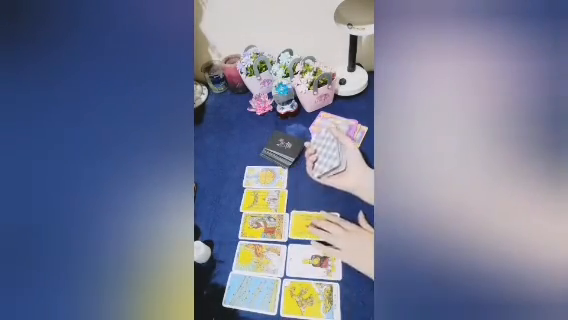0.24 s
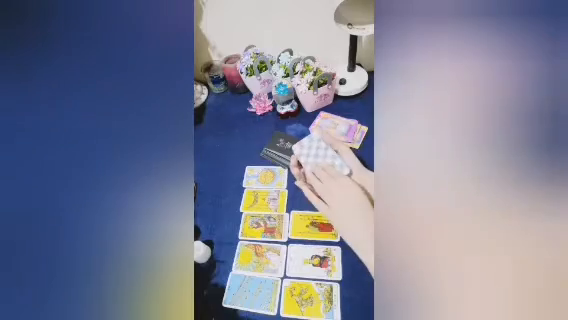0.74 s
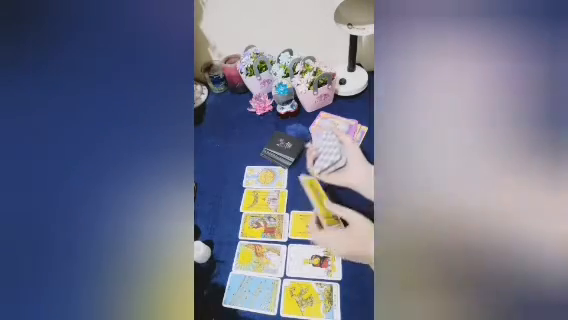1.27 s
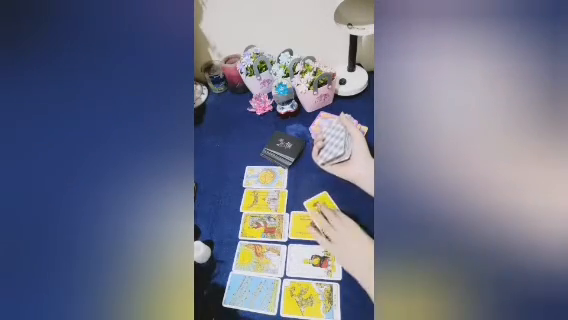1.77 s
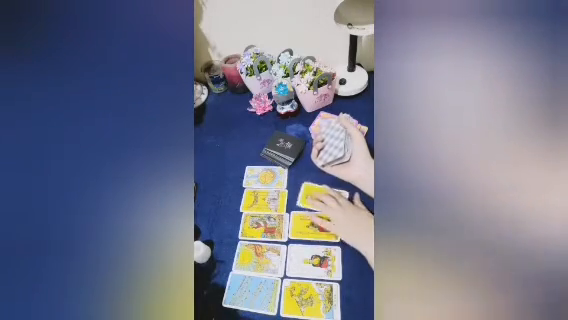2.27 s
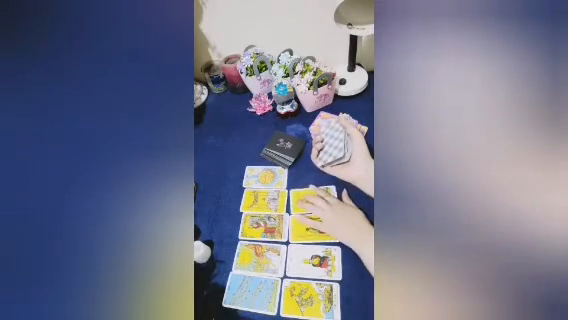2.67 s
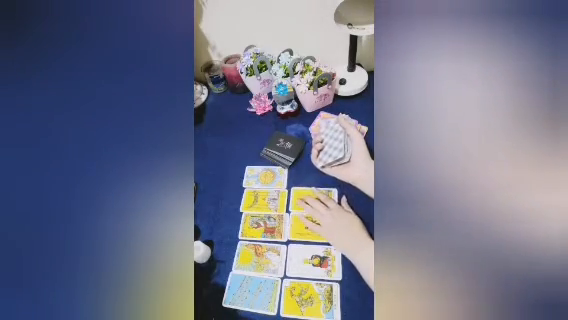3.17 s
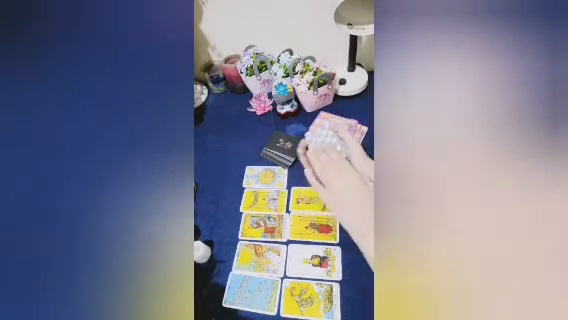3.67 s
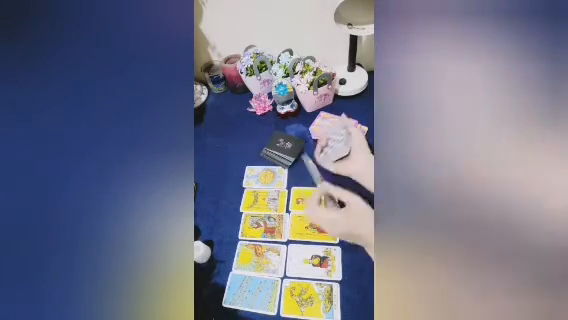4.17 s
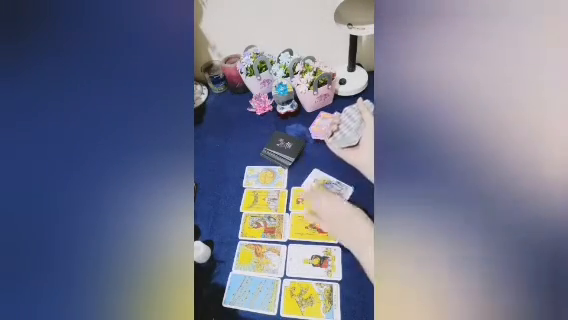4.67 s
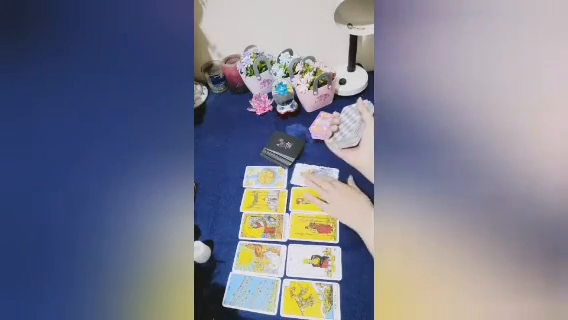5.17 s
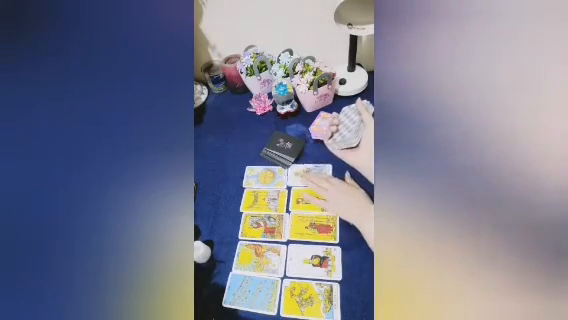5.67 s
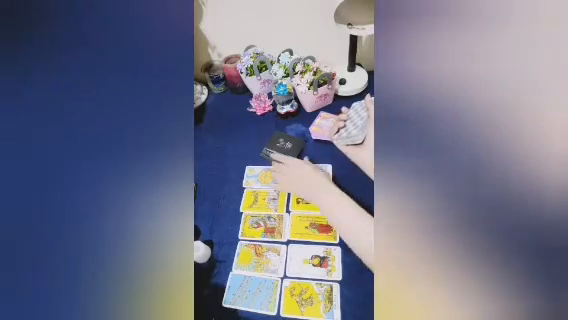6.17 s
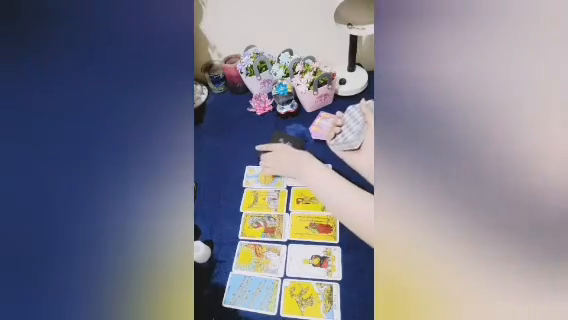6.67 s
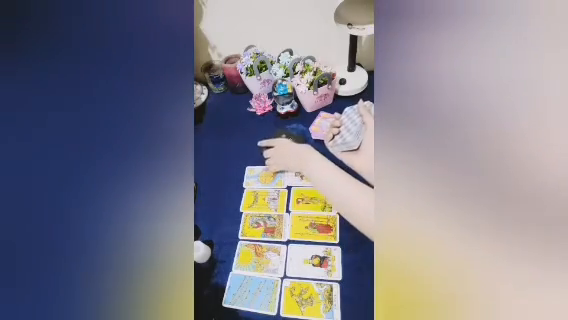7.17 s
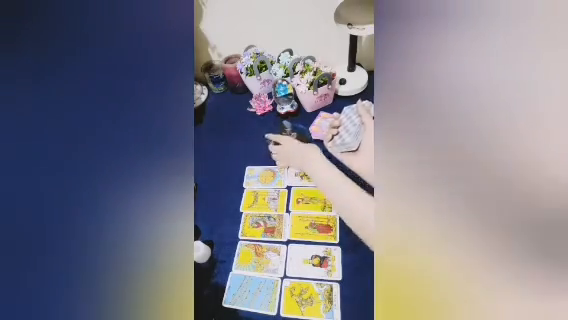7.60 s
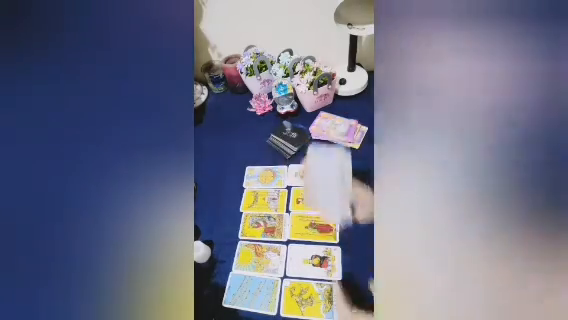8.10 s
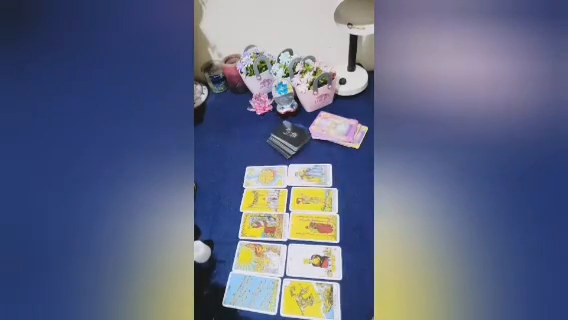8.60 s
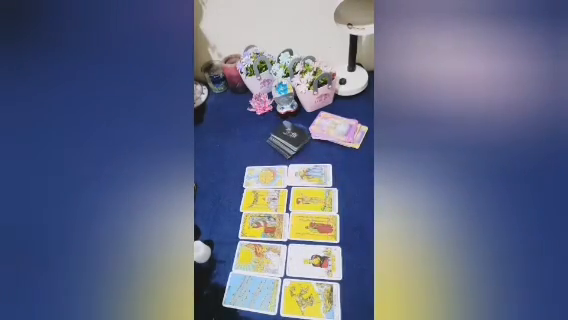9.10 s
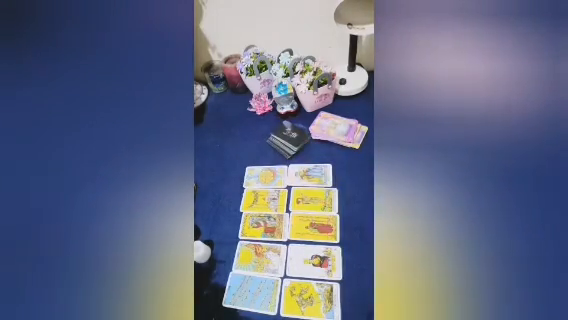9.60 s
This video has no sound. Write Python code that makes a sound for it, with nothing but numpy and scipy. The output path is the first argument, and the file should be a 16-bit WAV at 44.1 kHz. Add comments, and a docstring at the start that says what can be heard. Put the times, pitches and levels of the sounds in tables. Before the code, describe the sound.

Close on a cloth-covered table, three cards in turn scrape off the deck, snap crisply and scuff into place. Mains hum, a fluttering fan, soft hiss and very faint fast clock ticks continue underneath. A dull tap and a brief slide follow, then a very loud, short wooden bang with rattling bounces, ducking the room sound, and a faint last tap.

```python
"""Tarot cards are drawn from a hand-held deck, snapped down and slid into place on a cloth-covered table.
Under them a small room hums, hisses, whines and ticks; near the end a hard knock on wood ducks a limiter.
Snaps and knocks are damped modes with noise cracks; slides are grainy noise shaped by the hand's speed.
An appliance's hum and motor and the whine of electronics are wavering sines.
The fan's air, the low rumble and the small clock's ticks are filtered noise."""
import sys
import numpy as np
from scipy import signal
from scipy.fft import rfft, irfft, next_fast_len
from scipy.io import wavfile
from scipy.ndimage import uniform_filter1d, minimum_filter1d, map_coordinates

SR = 44100
rng = np.random.default_rng(int(sys.argv[2]) if len(sys.argv) > 2 else 0)


def store_wav(level_fs):
    """Save 16-bit WAV to argv[1]."""
    pcm = np.round(np.clip(np.atleast_2d(level_fs), -1, 1) * 32767)
    wavfile.write(sys.argv[1], SR, pcm.T.astype(np.int16))


N = 434385  # length in samples


def amp(db):
    """Decibels to gain."""
    return 10 ** (np.asarray(db) / 20)


def unit(x):
    """Scale to rms 1."""
    return x / np.sqrt(np.mean(x ** 2) + 1e-20)


def along(points, hz):
    """Read (frequency [Hz], value) points on a log frequency axis."""
    f, v = np.transpose(points)
    return np.interp(np.log(hz + 1), np.log(f + 1), v)


def seconds():
    """The time of every sample."""
    return np.arange(N) / SR


def pan(db):
    """Left and right gains for a level difference, left minus right."""
    return amp(np.array([np.atleast_1d(db), -np.atleast_1d(db)]) / 2)


def wobble(rate):
    """A smooth random curve, rate knots a second."""
    knots = rng.standard_normal(int(N * rate / SR) + 4)
    return map_coordinates(knots, [np.arange(N) * rate / SR])


def filtered(x, response):
    """Multiply the spectrum of x by a response of frequency."""
    n = x.shape[-1]
    m = next_fast_len(n + SR // 4)
    hz = np.fft.rfftfreq(m, 1 / SR)
    return irfft(rfft(x, m) * response(hz), m)[..., :n]


def coloured(x, spectrum):
    """Shape x with a spectrum in dB, then scale it to rms 1."""
    return unit(filtered(x, lambda hz: amp(along(spectrum, hz))))


def decay(t, t60):
    """An envelope that falls 60 dB in t60 seconds."""
    return np.exp(-np.log(1000) * t / t60)


def ring(t, hz, t60):
    """One damped mode: a sine that dies away exponentially."""
    return np.sin(2 * np.pi * hz * t) * decay(t, t60)


def burst(t, t60):
    """A short dying burst of noise, flattened to an even spectrum and energy 1 before a slower fade."""
    z = rfft(rng.standard_normal(len(t)) * decay(t, t60))
    flat = irfft(z / (np.abs(z) + 1e-12), len(t))
    return flat * decay(t, 10 * t60)


def add(track, s, sound):
    """Mix a sound into the track at time s."""
    part = track[round(s * SR):][:len(sound)]
    part += sound[:len(part)]


def spread(pair):
    """Mix two unrelated noises into a diffuse field whose left-right likeness depends on frequency."""
    # how alike the two sides are: (frequency [Hz], correlation [-1 to 1])
    likeness = [(60, 0.84), (130, 1), (290, 0.94), (630, 0.21), (1390, -0.013), (3040, -0.23), (6660, 0.81),
                (14600, 1)]

    def mid_side_gains(hz):
        angle = np.arccos(np.clip(along(likeness, hz), -1, 1)) / 2
        return np.array([np.cos(angle), np.sin(angle)])

    mid, side = filtered(pair, mid_side_gains)
    return np.array([mid + side, mid - side])


def in_room(x, wet_db, lean_db, lag_ms=0):
    """The direct sound, later on the left by the lag, plus a diffuse tail, different at each microphone."""
    # reverberation of the small room: (frequency [Hz], t60 [s])
    room_t60 = [(100, 0.6), (1000, 0.53), (3000, 0.48), (7000, 0.43), (14000, 0.44)]
    hz, t, z = signal.stft(rng.standard_normal((2, SR // 2)), SR, nperseg=256)
    dying = z * decay(t, along(room_t60, hz)[:, None])
    tail = spread(signal.istft(dying, SR, nperseg=256)[1])
    # the tail starts 2.5 ms after the direct sound
    tail = np.pad(tail / np.linalg.norm(tail[0]), ((0, 0), (SR // 400, 0)))
    late = filtered(x, lambda hz: np.exp(-2j * np.pi * hz * lag_ms / 1000))
    direct = np.array([late, x]) * pan(lean_db)
    return direct + amp(wet_db) * signal.fftconvolve(x[None], tail, axes=1)[:, :N]


def rumble(db=-66.0):
    """A faint low rumble of bass noise: a shared part leaning right, and a part opposite on the two sides."""
    colour = [(15, -25), (30, -4), (45, -4), (58, -7), (80, -11), (160, -42), (600, -100)]
    noise = coloured(rng.standard_normal((2, N)), colour)
    shared = noise[0] * pan(-4)
    opposed = .4 * noise[1] * np.array([[1], [-1]])
    return amp(db) * (shared + opposed)


def air(fan_db=-44, hiss_db=-57.0, cross_hz=1500):
    """The fan's hollow, fluttering rush below a crossover and a soft steady hiss above it, both noise."""
    # colour of the fan's rush: (frequency [Hz], relative level [dB])
    fan_colour = [(20, -20), (70, -19), (120, 1), (200, -9.5), (243, 5.5), (275, -1.5), (297, -1),
                  (340, -8), (430, -10), (495, -3), (680, -9), (1000, -12.5), (1500, -17)]
    # colour of the room's hiss: (frequency [Hz], relative level [dB])
    hiss_colour = [(1500, 0.5), (2100, 1), (2800, -2), (3500, -5.5), (4300, -12), (5700, -13.5),
                   (6600, -18), (7500, -15), (8300, -24), (10500, -24.5), (12500, -29), (15000, -36)]
    # stereo tilt: (frequency [Hz], left minus right [dB])
    stereo_tilt = [(60, -33), (130, -14.5), (290, -2.5), (630, -2), (1390, -2), (3040, -2), (6660, -2.5),
                   (14600, 3.5)]
    noise = lambda spectrum: coloured(rng.standard_normal((2, N)), spectrum)
    low = lambda hz: 1 / np.sqrt(1 + (hz / cross_hz) ** 10)
    high = lambda hz: np.sqrt(1 - low(hz) ** 2)
    rush = unit(filtered(noise(fan_colour), low)) * amp(fan_db + 1.14 * wobble(6))
    hiss = unit(filtered(noise(hiss_colour), high)) * amp(hiss_db)
    return filtered(spread(rush + hiss), lambda hz: pan(along(stereo_tilt, hz)))


def appliance(sway=0.068, idle_db=-57.1, loaded_db=-51.1):
    """Mains hum, swayed by each turn of the fan, over the throb of an induction motor that grows under load."""
    # hum partials: (frequency [Hz], rms level before wavering [dB], left minus right [dB])
    hum_partials = [(100, -35.5, -5), (200, -65.5, 5), (300, -53.5, 4.5)]
    t = seconds()
    turn_hz, shaft_hz, mains_hz = 16.65, 48.9, 50
    swing = 1 + sway * np.sin(2 * np.pi * turn_hz * t + 1.5 * wobble(1.3))
    hum = 0
    for hz, db, lean_db in hum_partials:
        locked_hz = mains_hz * np.round(hz / mains_hz)
        level = amp(db + 0.73 * wobble(9.6))
        partial = unit(np.sin(2 * np.pi * locked_hz * t + 0.21 * wobble(2.47)))
        hum = hum + level * pan(lean_db) * partial
    shaft = unit(np.sin(2 * np.pi * shaft_hz * t + .15 * wobble(3)))
    # soft at first, the motor takes up load at 3.1 s and stays louder
    load = np.clip((t - 3.1) / .2, 0, 1)
    throb = amp(idle_db + (loaded_db - idle_db) * load) * shaft
    return swing * hum + throb * pan(-4.5)


def whine(waver_db=2.5, blur=1):
    """Thin, unsteady sines of electronics; their phase drifts apart at the two microphones."""
    # whining tones: (frequency [Hz], rms level before wavering [dB])
    tones = [(2202, -98), (2740, -73.5), (3332, -77), (3478, -76), (3623, -81.5), (3822, -80), (4936, -81)]
    t = seconds()
    drift = lambda: blur * np.array([wobble(8.7), wobble(8)])
    tone = lambda hz: unit(np.sin(2 * np.pi * hz * t + drift()))
    return sum(amp(db + waver_db * wobble(6.4)) * tone(hz) for hz, db in tones)


def clock(tick_db=-69.5, tock_db=-74.0, uneven_db=1.8, t60=0.18):
    """A small movement: bright metallic noise pulsed into a thin tick and a weaker tock in each cycle."""
    period, first, gap = .31365, .142, .146  # s
    t = seconds()

    def beat(start):
        """Swell quickly into each beat, then die away."""
        age = (t - start + period / 2) % period - period / 2
        return np.where(age < 0, decay(np.abs(age), .06), decay(np.abs(age), t60))

    level = amp(tick_db) * beat(first) + amp(tock_db) * beat(first + gap)
    colour = [(4000, -26), (8200, -4), (9600, 3), (10800, -12), (14000, -18)]
    metal = coloured(rng.standard_normal(N), colour)
    return in_room(level * amp(uneven_db * wobble(9)) * metal, wet_db=-18, lean_db=-2.5)


def knocks(crack_t60=0.015, rattle_db=-17.5, rattle_t60=0.25, chatter_db=3.5, lowest_hz=90):
    """Soft taps and one hard knock on wood: a cluster of contacts and bounces sets the board ringing and chattering."""
    # contacts on wood: (time [s], overall level [dB], relative crack level [dB], relative boom level [dB],
    # contact hardness as a low-pass cut-off [Hz], pitch of the clack [Hz])
    contacts = [(1.596, -38, -20, -22, 3500, 1020), (5.898, -34, -30, -13, 900, 560),
                (8.6671, -22, -18, -10, 3500, 1010), (8.6687, -5.5, -29, -5.5, 3500, 1000),
                (8.6698, -3.5, -19, .5, 3500, 1000), (8.6726, -9, -12, 3, 3500, 1040),
                (8.6855, -21.5, -22, 6.5, 3000, 940), (8.703, -30, -14, -4, 3500, 1100),
                (8.7170, -24, -22, 3, 3000, 760), (8.7450, -27, -26, -8, 2500, 1000),
                (8.7820, -27, -28, -8, 2000, 990), (8.8020, -32, -28, -9, 1800, 880),
                (8.8635, -23.5, -26, -4, 1100, 1000), (8.8675, -28, -24, 0, 950, 650),
                (9.7016, -31, -34, -6, 800, 670), (9.7120, -37, -32, -5, 800, 680)]
    # modes of the wood at a clack pitch of 1000 Hz: (frequency [Hz], relative level [dB], t60 [s])
    wood_modes = [(96, -16.5, 0.24), (137, -27, 0.15), (185, -24, 0.1), (244.6, -22, 0.23),
                  (306, -23.5, 0.12), (370.4, -18.5, 0.13), (298, -10.5, 0.019), (620, -11, 0.043),
                  (840, -18, 0.014), (995, -3, 0.015), (1126, -12, 0.02), (1470, -14.5, 0.022),
                  (1970, -16.5, 0.021), (2920, -14, 0.0071)]
    # colour of the crack: (frequency [Hz], relative level [dB])
    crack_colour = [(200, 4), (1200, -10), (2400, 5), (3300, 6), (4300, -1), (5500, -3), (7500, -11.5),
                    (11000, -27), (15000, -35)]
    # colour of the board's rattle: (frequency [Hz], relative level [dB])
    rattle_colour = [(120, 8.5), (200, 0), (380, 3), (500, -3.5), (700, 7), (1020, 0.5), (1350, -5.5),
                     (2100, -5), (2700, -18), (3600, -26), (6000, -41), (14000, -52)]
    board_below_hz, clack_hz = 450, 1000
    out, t = np.zeros(N), np.arange(SR // 2) / SR
    chatter = unit(amp(chatter_db * wobble(220)))
    board_modes = [mode for mode in wood_modes if mode[0] < board_below_hz]
    clack_modes = [mode for mode in wood_modes if mode[0] >= board_below_hz]
    for s, db, crack_db, boom_db, contact_hz, pitch_hz in contacts:
        # only a heavy blow moves the slow modes of the whole board; the quick ones shift with the point of contact
        boom = sum(amp(mode_db + boom_db) * ring(t, hz, t60) for hz, mode_db, t60 in board_modes)
        clack = sum(amp(mode_db) * ring(t, hz * pitch_hz / clack_hz, t60) for hz, mode_db, t60 in clack_modes)
        crack_noise = coloured(rng.standard_normal(len(t)), crack_colour)
        crack = amp(crack_db) * crack_noise * decay(t, crack_t60)
        grains = rng.standard_normal(len(t)) * np.roll(chatter, -round(s * SR))[:len(t)]
        rattle = amp(rattle_db) * coloured(grains, rattle_colour) * decay(t, rattle_t60)
        rise = 1 - decay(t, 0.0023)
        soften = signal.butter(2, contact_hz, fs=SR, output="sos")
        cushioned = signal.sosfilt(soften, boom + clack + rattle * rise)
        add(out, s, amp(db) * (cushioned + crack * rise))
    # the board is too small to radiate deep bass
    out = signal.sosfilt(signal.butter(4, lowest_hz, "highpass", fs=SR, output="sos"), out)
    return in_room(out, wet_db=-9.0, lean_db=-5.0, lag_ms=0.1)


def strokes(grain_db=4.5, catch_db=2.5):
    """Sliding cards catch on fibres and on each other in tiny clumped grains, swelling and fading with the hand's speed."""
    # strokes and brief scrapes: (start [s], loudest [s], end [s], scuff level at the loudest [dB],
    # hiss of card on card relative to scuff on cloth [dB])
    slides = [(0.85, .866, 0.87, -55, -26), (.905, 0.922, 1.05, -70, -4), (.96, 1.07, 1.14, -71, 4),
              (1.125, 1.137, 1.18, -59, -18), (1.05, 1.24, 1.32, -66.5, -20),
              (1.235, 1.244, 1.254, -60, -24), (1.275, 1.302, 1.32, -57.5, -28),
              (1.32, 1.35, 1.39, -66, -8), (1.632, 1.64, 1.69, -58.5, -2), (1.914, 1.92, 1.97, -61, -10),
              (1.972, 2.202, 2.41, -62.5, -9.5), (2.3, 2.45, 2.7, -70, -6), (3.88, 3.96, 4.2, -72, -4),
              (3.98, 4.08, 4.2, -67, -5), (4.103, 4.114, 4.128, -58, -18),
              (4.185, 4.202, 4.25, -62.5, -1.5), (4.35, 4.385, 4.45, -70, -5),
              (4.485, 4.52, 4.53, -60.5, -9), (4.59, 4.61, 4.66, -64, -9), (4.884, 4.895, 4.94, -65, -10),
              (4.95, 5.17, 5.5, -65.5, -12), (5.33, 5.385, 5.42, -67, -25), (7.965, 8.06, 8.24, -60.5, -11)]
    # colour of card on cloth: (frequency [Hz], relative level [dB])
    scuff_colour = [(500, -22), (1500, 3), (2600, 3.5), (4000, -1.5), (5600, -6.5), (7000, -12),
                    (15000, -28)]
    # colour of card on card: (frequency [Hz], relative level [dB])
    hiss_colour = [(2000, -13), (5000, -1), (7500, 6), (11000, 1), (15000, -11)]
    t, out = seconds(), np.zeros(N)
    catches = catch_db * wobble(110)  # shared by scuff and hiss
    grains = lambda: rng.standard_normal(N) * amp(grain_db * wobble(700) + catches)
    scuff = coloured(grains(), scuff_colour)
    hiss = coloured(grains(), hiss_colour)
    for start, top, end, db, hiss_db in slides:
        speed = np.interp(t, [start, top, end], [0, 1, 0])
        out += amp(db) * speed * (scuff + amp(hiss_db) * hiss)
    return in_room(out, wet_db=1, lean_db=-6)


def snaps(crack_t60=0.018, crack_gain_db=14.0, echo_db=-8, tap_hz=1160, tap_t60=0.025):
    """A bent card springs flat: a crack and a short papery ring over a dull tap, mirrored by the table top."""
    # card edges flicking off a finger: (time [s], overall level [dB], card pitch [Hz], ring t60 [s],
    # relative twisting mode level [dB], table echo delay [ms], crack level before the common gain [dB],
    # relative fingertip tap level [dB])
    flicks = [(1.6314, -27.5, 2750, 0.014, -10, 2.4, -1.5, -6.5),
              (1.6375, -37, 2880, .005, -13, 2.6, 2, -20), (1.9134, -28.5, 2930, 0.0037, 1, 1.35, -9, -24),
              (3.889, -46.5, 3000, .004, -6, 1.8, -3, -20), (4.596, -44, 3000, .004, -11, 2.2, 0, -18),
              (4.8815, -28, 3120, 0.0068, -7, 2.9, -14, -30),
              (4.8919, -44, 3150, 0.0055, -11, 2.4, -3, -28)]
    # colour of the crack: (frequency [Hz], relative level [dB])
    crack_colour = [(500, -22), (1800, -16), (2800, -5), (5000, -4), (7000, 0), (9000, 1), (11000, -4),
                    (12500, -13), (15000, -21)]
    # higher bending modes: (multiple of the card's pitch [ratio], level before following the crack [dB])
    bending_modes = [(1.15, -7), (1.41, -7), (1.92, -4)]
    twist_ratio = 1.17  # twisting mode as a multiple of the card's pitch
    overtones_follow = 0.95  # dB more in the higher modes for each dB more of crack
    out, t = np.zeros(N), np.arange(SR // 10) / SR
    for s, db, hz, t60, twist_db, echo_ms, crack_db, tap_db in flicks:
        fibres = amp(crack_db + crack_gain_db) * burst(t, crack_t60)
        # ten samples late
        crack = filtered(np.roll(fibres, shift=10), lambda f: amp(along(crack_colour, f)))
        modes = [(1, 0), (twist_ratio, twist_db)]
        modes += [(multiple, mode_db + overtones_follow * crack_db) for multiple, mode_db in bending_modes]
        # paper damps its higher modes faster
        paper = sum(amp(mode_db) * ring(t, hz * multiple, t60 / multiple) for multiple, mode_db in modes)
        paper = signal.sosfilt(signal.butter(3, hz * 0.67, "highpass", fs=SR, output="sos"), paper)
        tap = amp(tap_db) * ring(t, tap_hz, tap_t60)
        add(out, s, amp(db) * (paper + crack + tap))
        add(out, s + echo_ms / 1000, amp(db + echo_db) * paper)
    return in_room(out, wet_db=-9.5, lean_db=-2, lag_ms=0.02)


def scene():
    """Cards and knocks over the steady sounds of the room."""
    background = rumble() + air() + appliance() + whine() + clock()
    return background + knocks() + strokes() + snaps()


def record(dry, ceiling_db=-3.0, release=0.7):
    """A limiter ducks at a loud peak and recovers slowly; what slips past it is rounded off; then the band limit."""
    t = seconds()
    loudest_side = (dry ** 2).max(axis=0)
    level = np.sqrt(2 * np.abs(uniform_filter1d(loudest_side, size=88)))
    excess = np.maximum(1 - amp(ceiling_db) / (level + 1e-9), 0)
    # hold the deepest cut so far and let it fade with the release time constant [s]
    held = np.maximum.accumulate(excess * np.exp(t / release)) * np.exp(-t / release)
    # widen the duck around the peak, then smooth its edges
    gain = minimum_filter1d(1 - held, size=200)
    gain = uniform_filter1d(uniform_filter1d(gain, size=100), size=100)
    ducked = dry * gain
    rounded = ducked / (1 + (ducked / .95) ** 6) ** (1 / 6)
    return filtered(rounded, lambda hz: hz < 15150)


dry = scene()
out = record(dry)
store_wav(out)
```